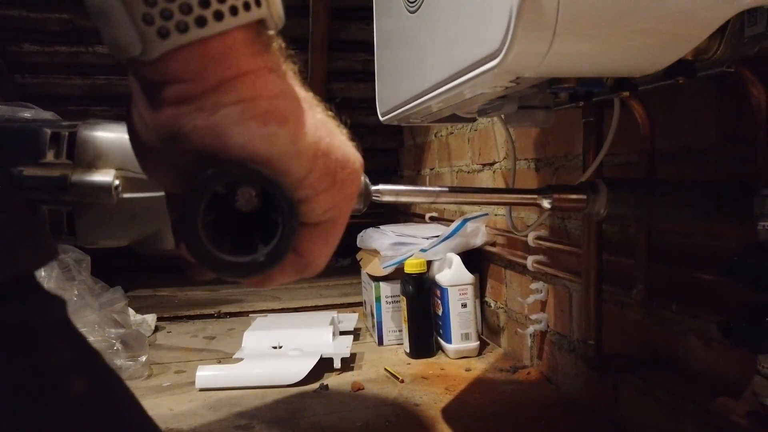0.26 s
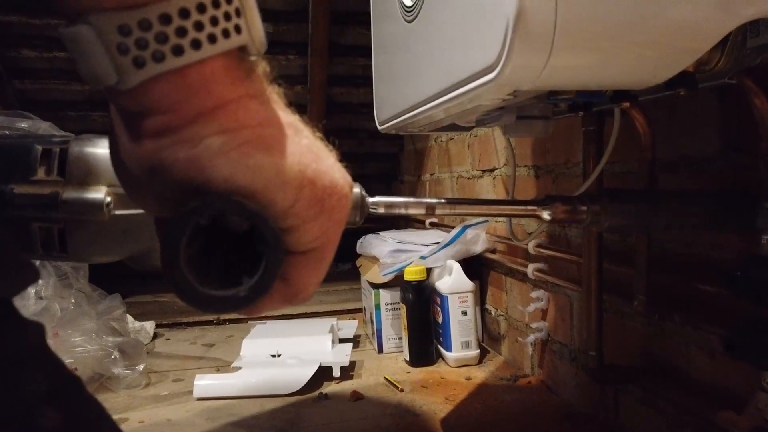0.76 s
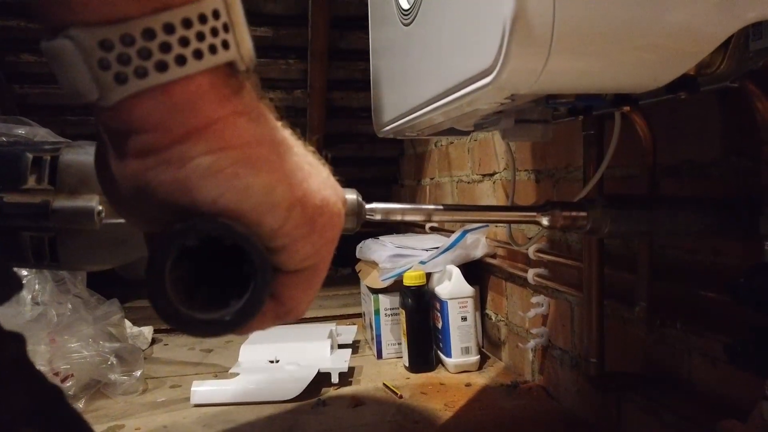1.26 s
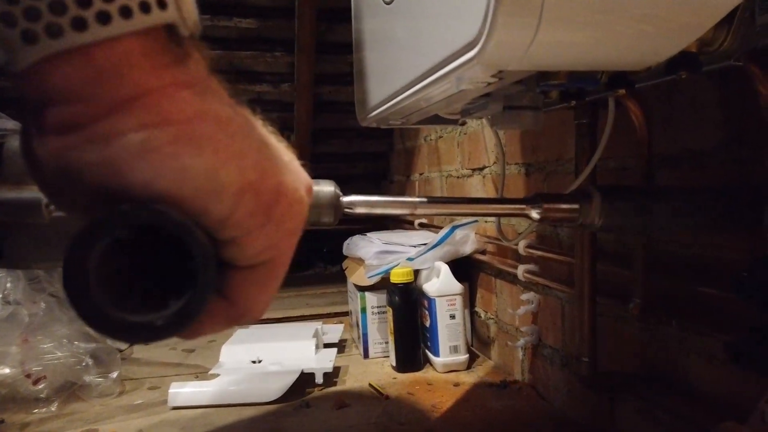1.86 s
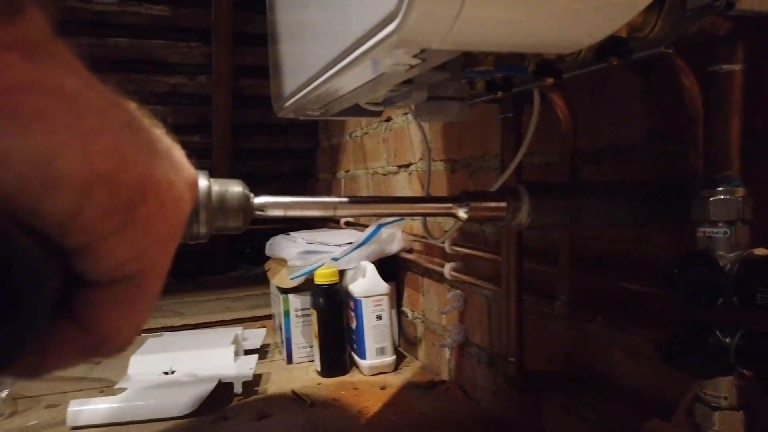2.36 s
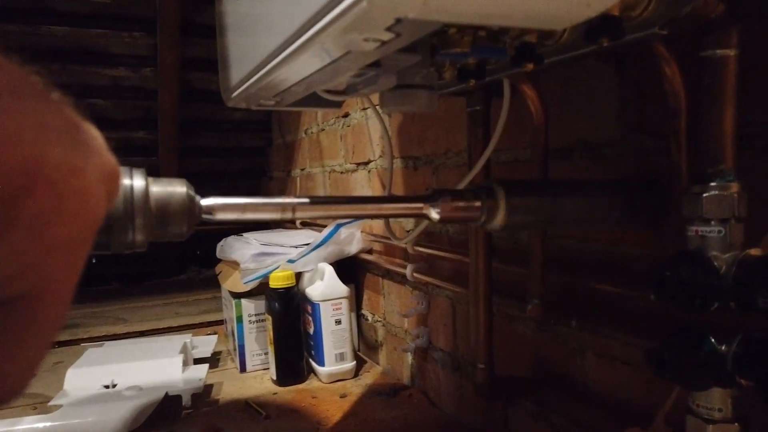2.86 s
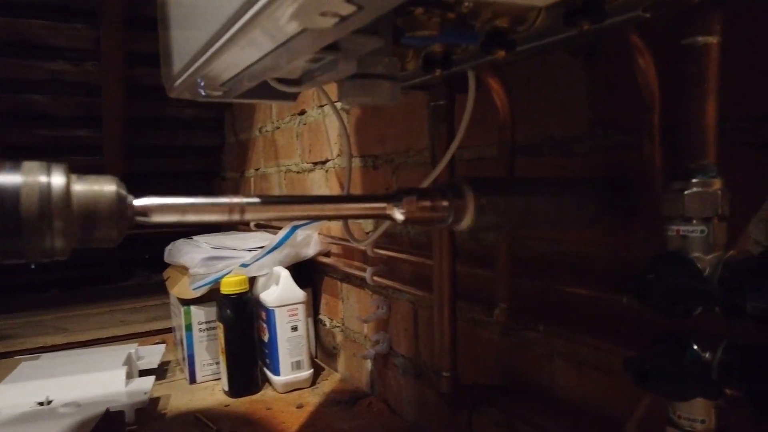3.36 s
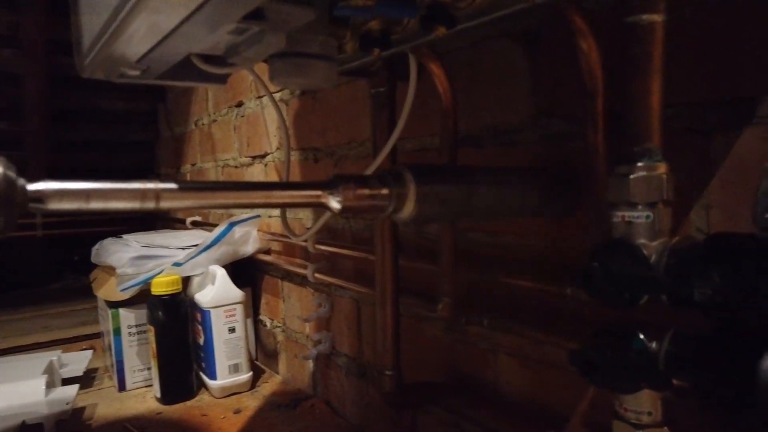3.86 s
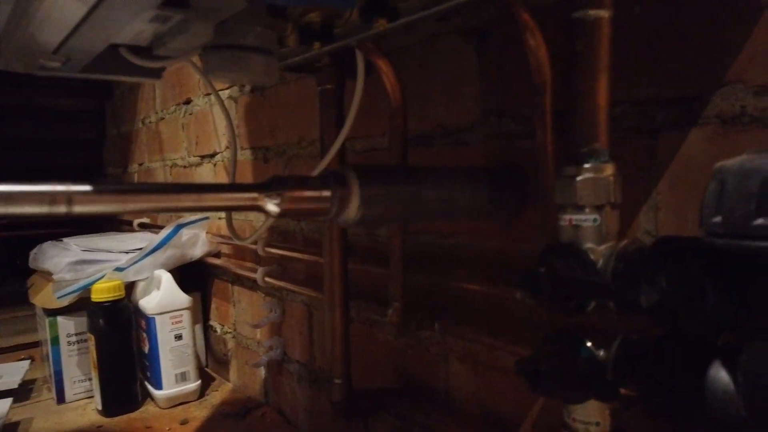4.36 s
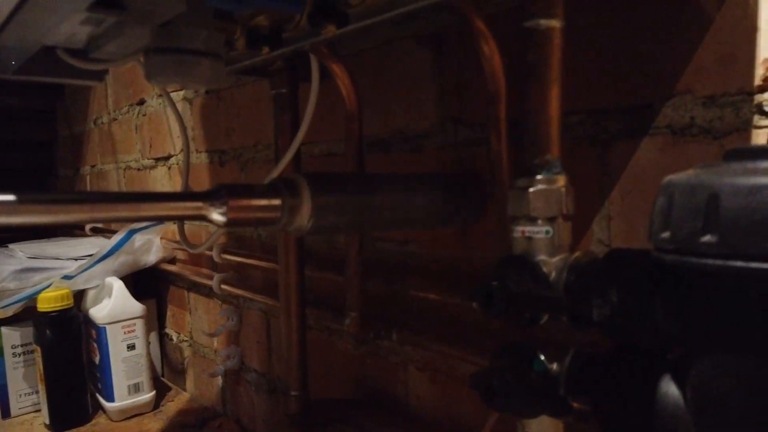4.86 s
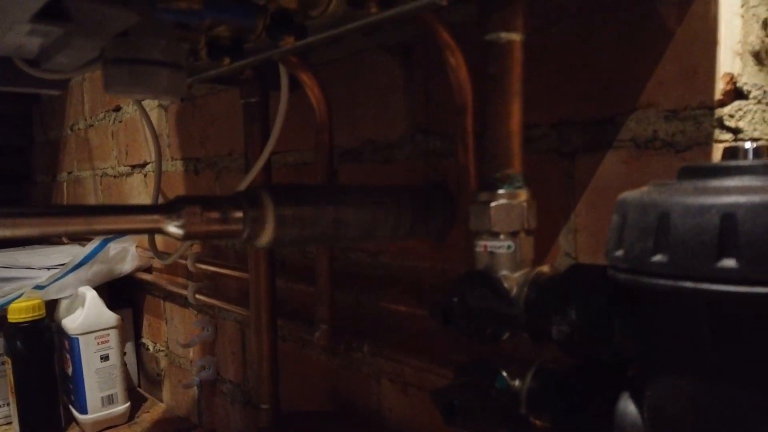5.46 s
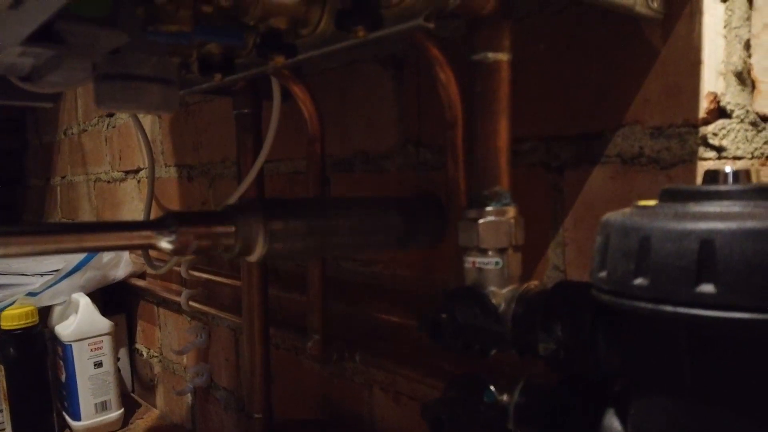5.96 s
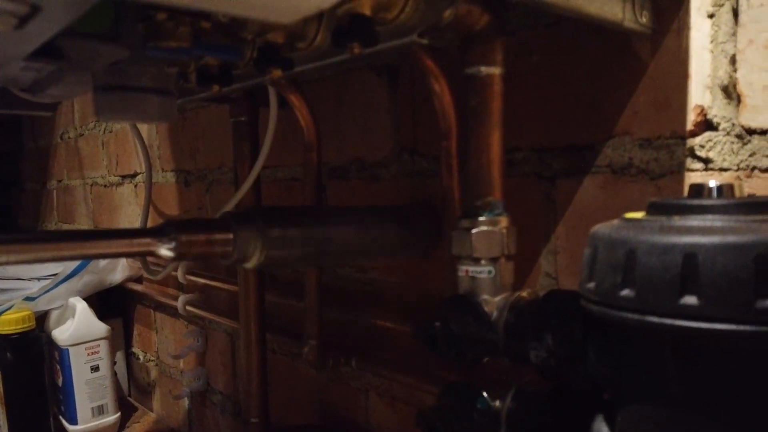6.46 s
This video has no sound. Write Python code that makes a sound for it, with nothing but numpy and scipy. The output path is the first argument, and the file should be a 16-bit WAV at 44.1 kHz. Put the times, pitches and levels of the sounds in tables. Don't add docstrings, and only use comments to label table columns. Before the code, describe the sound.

Close by in a small brick utility room, an electric core drill spins up within a second to a steady high whine. Gritty grinding and bright hiss run throughout, with soft wall thumps about ten times a second. Around halfway, the steel barrel begins to squeal, a piercing pulsing tone that dominates, eases briefly near the end, then returns. The drill is still running when it stops.

```python
import sys
import numpy as np
from scipy import signal
from scipy.io import wavfile
from scipy.ndimage import uniform_filter1d

SR = 44100
rng = np.random.default_rng(int(sys.argv[2]) if len(sys.argv) > 2 else 0)


def transcribe(u):
    v = np.clip(np.atleast_2d(u).T, -1, 1)
    q = np.round(v * 32767).astype(np.int16)
    wavfile.write(sys.argv[1], SR, q)


def ratio_of_db(decibels):
    return 10 ** (np.asarray(decibels, float) / 20)


N = 295911
CONTROL_STEP = 40


def rms_one(x):
    return x / np.sqrt(np.mean(x ** 2) + 1e-20)


def in_time(rows):
    time_s, *columns = np.transpose(rows)
    t = np.arange(N) / SR
    return [np.interp(t, time_s, column) for column in columns]


def at_hz(points, hz):
    points = np.array(points)
    return np.interp(np.log(hz), np.log(points[:, 0]), points[:, 1])


def coarse(rate_hz):
    r = np.exp(-2 * np.pi * CONTROL_STEP * rate_hz / SR)
    white = rng.standard_normal(N // CONTROL_STEP + 2001)
    settled = signal.lfilter([1], [1, -2 * r, r * r], white)[2000:]
    return rms_one(settled)


def stretch(control):
    return np.interp(np.arange(N) / CONTROL_STEP, np.arange(len(control)), control)


def drift(rate_hz):
    return stretch(coarse(rate_hz))


def phase_of(hz):
    return 2 * np.pi * np.cumsum(hz) / SR


def tone(phase, lead_rad):
    return np.sqrt(2) * np.sin([phase + lead_rad / 2, phase - lead_rad / 2])


def pair(alike):
    mid, side = rng.standard_normal((2, N))
    return np.sqrt((1 + alike) / 2) * mid + np.sqrt((1 - alike) / 2) * side * [[1], [-1]]


def lowpass(x, hz):
    return signal.sosfilt(signal.butter(2, hz, fs=SR, output="sos"), x)


def bandpass(x, low_hz, high_hz):
    return signal.sosfilt(signal.butter(2, [low_hz, high_hz], "band", fs=SR, output="sos"), x)


def resonate(x, hz, width_hz):
    r = np.exp(-np.pi * width_hz / SR)
    return signal.lfilter([1, 0, -1], [1, -2 * r * np.cos(2 * np.pi * hz / SR), r * r], x)


def clicks(rows, column):
    rows = np.array(rows)
    out = np.full(N, 1e-18)
    out[(rows[:, 0] * SR).astype(int)] = ratio_of_db(rows[:, column])
    return out


def swell(x, rise_s, fall_s):
    t = np.arange(int(.2 * SR)) / SR
    bump = (1 - np.exp(-t / rise_s)) * np.exp(-t / fall_s)
    return signal.fftconvolve(x, bump / bump.max())[:N]


def each_turn(turns, levels_db, scatter_db):
    at = np.flatnonzero(np.diff(np.floor(turns)) > 0)
    chance = np.random.default_rng(rng.integers(2 ** 31)).standard_normal((len(at), len(levels_db)))
    return np.c_[at / SR, np.transpose(levels_db)[at] + scatter_db * chance]


# [t/s, speed/(turns/s)]
ARMATURE_SPEED = [(0, 212), (.1, 250), (.2, 292), (.3, 318), (.43, 346), (.55, 366), (.75, 396), (1, 411),
                  (1.3, 414.5), (2, 410.5), (2.7, 411), (3.3, 402), (4.3, 399), (4.7, 398), (5.3, 412),
                  (5.7, 416.5), (6.2, 411), (6.71, 402)]


def barrel_turns():
    return np.cumsum(in_time(ARMATURE_SPEED)[0]) / SR / 40.3


# [t/s, hum/dB, mesh/dB, fan/dB]
MOTOR_LEVELS = [(0, -44, -42.5, -60), (.1, -54, -34.5, -49), (.2, -60, -40, -47.5), (.28, -52, -50, -47.5),
                (.45, -54, -39, -47.5), (.6, -43, -47, -50), (.9, -39.5, -50, -54),
                (1.15, -40.5, -45, -48.5), (2.8, -38.5, -42.5, -51), (3.1, -40, -43, -62),
                (3.85, -42, -44, -60), (4, -42, -44, -50), (4.6, -43, -45.5, -51), (5.1, -42.5, -45, -58),
                (5.4, -43.5, -45, -49), (6.0, -42.5, -45, -51), (6.71, -43.5, -47, -55)]
MESH_ORDERS = [5.84, 6.14]
WHINE_ORDERS = [1.31, 2, 19.5]
# [level/dB, flicker/dB, growth exponent with speed]
WHINE_LEVELS = [(-56, 1.5, 5.0), (-55, 1.5, 5.0), (-47.5, 3.0, 5.0)]


def motor():
    speed = in_time(ARMATURE_SPEED)[0]
    turn = phase_of(speed)
    hum_db, mesh_db, fan_db = in_time(MOTOR_LEVELS)
    out = ratio_of_db(hum_db + 1.9 * drift(18)) * tone(turn, 0.25)
    fan_phase = 34.97 * turn + .8 * drift(15)
    out += ratio_of_db(fan_db + 2.2 + 3.5 * drift(9)) * tone(fan_phase, .7)
    mesh_lead_rad = np.interp(speed, [300, 390], [.4, 1.9])
    for order in MESH_ORDERS:
        mesh_phase = order * turn + .25 * drift(12) + .4 * drift(70)
        out += ratio_of_db(mesh_db + 1.5 + 1.5 * drift(14)) * tone(mesh_phase, mesh_lead_rad)
    for order, (level_db, flicker_db, growth) in zip(WHINE_ORDERS, WHINE_LEVELS):
        ripple = .03 * order * drift(9.9)
        level = (speed / 412) ** growth * ratio_of_db(level_db + flicker_db * drift(13.0))
        out += level * tone(order * turn + ripple, 0.24 * order)
    return out


# [f/Hz, level/dB]
GRIND_COLOUR = [(25, 1.5), (60, -5), (120, -4.5), (200, -7), (320, -9), (500, -3.5), (800, -4), (1400, 1.5),
                (2500, -1.5), (4000, -3.5), (6300, -6), (10000, -2), (13000, -2.5), (15800, -8)]
# [f/Hz, correlation]
EAR_LIKENESS = [(30, .3), (70, 0.73), (130, 0.79), (900, 0.94), (1700, 0.85), (2200, 0.038), (3200, 0.58),
                (4500, 0.16), (8000, 0.43), (15000, 0.26)]
# [t/s, pressure/dB, distance loss/dB]
CUT_LOAD = [(0, 3, 10), (.09, 2, -1), (.32, -2, 1.5), (1.2, 0, 1.5), (3, 2.5, -0.5), (4.2, 1.5, 3),
            (4.8, 3.5, 0), (5.6, 0.9, 6.5), (6.28, 2.5, 6), (6.71, 2.3, 4.5)]
# [f/Hz, share of pressure, share of distance loss]
LOAD_SHARES = [(149, 0.51, 1.2), (780, 1, -0.15), (4500, 1, -0.28), (10000, 0.35, 0.17)]
# [f/Hz, width/Hz, level/dB, extra in spin-up/dB]
BODY_MODES = [
    (180, 28, -54.5, 17),
    (239, 33, -64, -21),
    (1237, 390, -52, 2),
    (1698, 67, -48, 11),
    (2125, 25, -39, 4),
    (3144, 55, -39.5, 6),
    (4800, 500, -45.5, -2),
    (7560, 130, -51, 9),
]


def grinding(blows, patchy_db=1.11, throb_db=1.4):
    pressure_db, far_db = [column[::CONTROL_STEP] for column in in_time(CUT_LOAD)]
    far_db = far_db - far_db.mean()
    grip_db = in_time(GRIP_CURVE)[0][::CONTROL_STEP]
    spread = 0.39 * np.clip((grip_db + 22) / 11, 0, 1)
    shares = np.array(LOAD_SHARES)
    push = swell(clicks(blows, column=2) > 1e-9, 0.0036, 0.0043)[::CONTROL_STEP]
    spin_up = np.exp(-np.arange(len(push)) * CONTROL_STEP / SR / .5)
    out = np.zeros((2, N))
    edges_hz = 24 * 2 ** np.arange(0, 9.7, .4)
    white = rng.standard_normal((2, 2, N))
    together = coarse(7.8)
    for k, (low_hz, high_hz) in enumerate(zip(edges_hz, edges_hz[1:])):
        mid, side = bandpass(white[k % 2], low_hz, high_hz)
        hz = np.sqrt(low_hz * high_hz)
        load_db = at_hz(shares, hz) * pressure_db - at_hz(shares[:, ::2], hz) * far_db
        load_db -= 5.0 * spin_up * (hz > 11000)
        alike = np.clip(at_hz(EAR_LIKENESS, hz) - spread * (hz < 2000), -.9, .99)
        flicker_db = patchy_db * (together / 3 + coarse(12))
        gain = ratio_of_db(at_hz(GRIND_COLOUR, hz) + load_db + throb_db * push + flicker_db)
        mid = mid * stretch(gain * np.sqrt(1 + alike))
        side = side * stretch(gain * np.sqrt(1 - alike))
        out += [mid + side, mid - side]
    out = ratio_of_db(-29.5) * rms_one(out)
    near, wide = pair(1.0), pair(0.19)
    for hz, width_hz, level_db, start_db in BODY_MODES:
        load_db = start_db * spin_up + 0.81 * coarse(17.0)
        feed = near if hz < 1900 else wide
        out += stretch(ratio_of_db(level_db + load_db)) * rms_one(resonate(feed, hz, width_hz))
    return out


# [t/s, centre f/Hz, glaze/dB (narrow hump to broad)]
RIM_WEAR = [(0, 10660, -5), (.5, 10670, -5.5), (1.7, 10650, -5), (2.4, 10660, -9.5), (3, 10950, -11),
            (3.6, 10800, -9), (4.4, 10770, -7.5), (5.1, 11000, 4), (5.8, 10360, 5), (6.1, 10620, 1),
            (6.71, 10710, 1)]


def rim_hiss():
    hz, glaze_db = in_time(RIM_WEAR)
    carrier = np.exp(1j * phase_of(hz))
    feed = pair(0.13) + 1j * pair(0.42)
    humps = [(-44 - glaze_db, 300), (-39.5 + 1.37 * glaze_db, 1300)]   # level/dB, half width/Hz
    out = 0
    for level_db, width_hz in humps:
        hump = rms_one(np.real(lowpass(feed, width_hz) * carrier))
        turn_db = 0.25 * np.sin(2 * np.pi * barrel_turns() + 1.3)
        out = out + ratio_of_db(level_db + 1.4 * drift(6.5) + turn_db) * hump
    return out


# [t/s, thump peak/dB, clack/dB, knock angle/turns]
BARREL_PLAY = [(.05, -22, -32, 0.33), (.2, -30, -37, 0.31), (.7, -29, -34, 0.39), (1.05, -21.5, -32, 0.34),
               (1.3, -23.5, -41, 0.26), (1.45, -26, -32, 0.39), (1.95, -18.5, -29.5, 0.36),
               (2.07, -22.5, -34, 0.36), (2.46, -27, -28, 0.39), (2.64, -22, -30, 0.39),
               (2.95, -28.5, -38, .43), (3.1, -35, -26, 0.49), (3.4, -48, -26, 0.53), (3.7, -37, -26, .5),
               (4.3, -71, -42, 0.35), (5.1, -37, -34, .42), (5.7, -35, -38, .42), (6.0, -67, -45, .4)]


def knock_rows():
    thump_db, clack_db, angle = in_time(BARREL_PLAY)
    return each_turn(barrel_turns() - angle, [thump_db, clack_db], scatter_db=1.5)


# [f/Hz, level/dB, time to top/s]
THUMP_MODES = [
    (170, 1, 0.007),
    (114, -14, 0.0094),
    (232, -15.5, 0.023),
]
# [t/s, peak/dB]
BARREL_RINGS = [(0.0967, -25.5), (0.2478, -28), (0.358, -34), (0.826, -30), (1.8701, -34), (2.1615, -28.5),
                (2.2498, -30), (2.4588, -33), (2.558, -27), (3.055, -28.5), (3.1577, -31), (3.3922, -39),
                (3.5583, -32), (3.6596, -30), (4.1999, -29), (4.582, -30.5), (4.7197, -25), (4.8229, -25.5),
                (4.9272, -20.5), (5.0085, -24.5), (5.1208, -23), (5.2205, -22), (6.1774, -30),
                (6.2672, -35)]


def knocks(blows):
    t = np.arange(int(.15 * SR)) / SR
    shape = 0
    for hz, level_db, top_s in THUMP_MODES:
        bump = (t / top_s * np.exp(1 - t / top_s)) ** 3
        shape = shape + ratio_of_db(level_db) * bump * np.sin(2 * np.pi * hz * t)
    thump = ratio_of_db(-2.5) * signal.fftconvolve(clicks(blows, column=1), shape)[:N]
    grit = pair(0.96)
    blow = swell(clicks(blows, column=2), 0.0033, 0.017) ** 1.378 / ratio_of_db(-9.0)
    clack = ratio_of_db(-3.5) * blow * rms_one(bandpass(grit, 230, 3400))
    clack = clack + ratio_of_db(-2.5) * blow * rms_one(resonate(grit, 2010, 50))
    ring_phase = phase_of(3155 + 25 * drift(12.43))
    ring = ratio_of_db(-2.5) * swell(clicks(BARREL_RINGS, column=1), 0.0081, 0.012) * tone(ring_phase, 1.0)
    return thump + clack + ring


# [t/s, top of a rub/dB, sag between rubs/dB, lateness of top/turns]
GRIP_CURVE = [(0, -46, -1, 0.061), (2.1, -40, -9, .1), (2.3, -32.5, 1, 0.59), (2.52, -24.5, 9.5, 0.078),
              (2.75, -27.5, 7, 0.11), (3.0, -24.5, 10, 0.13), (3.12, -16.5, 5, 0.046),
              (3.3, -17.5, 11, 0.043), (3.5, -8.5, 13, 0.018), (3.8, -12, 9, .02), (4.1, -9.5, 9, 0.022),
              (4.5, -10, 12.5, 0.033), (4.7, -13.5, 0, 0.22), (5.1, -7, 15.5, .07), (5.4, -26, 1.5, .1),
              (5.75, -27, 8, .1), (6, -10, 8, .1), (6.62, -10, 5, 0.27)]
RUB_SHAPE = [
    (0, 0.078),
    (.25, 0.39),
    (.55, 0.94),
    (.75, .8),
    (.9, 0.028),
]
# [t/s, top/dB, length/s]
HARD_SPOTS = [(0.035, -24.5, 0.031), (0.528, -28.5, 0.019), (.973, -29, 0.028), (2.49, -29.5, 0.027),
              (2.68, -27.5, 0.028), (2.918, -19, 0.042), (3.217, -18, 0.034), (3.313, -47, 0.013),
              (3.898, -20, .012), (4.637, -18, 0.054), (4.707, -16, .012), (4.746, -18, .015),
              (4.864, -35, 0.0049), (4.907, -0.5, 0.0096), (5.317, -30, 0.017), (5.825, -44, 0.014),
              (5.896, -50, 0.01), (6.176, -18, .012), (6.273, -15.5, 0.014), (6.373, -15.5, 0.0061),
              (6.412, -20, 0.0099), (6.473, -23, 0.0092)]
# [t/s, length/s]
GRIP_SLIPS = [
    (2.775, 0.021),
    (3.917, 0.012),
    (4.217, 0.0086),
    (4.728, 0.015),
    (4.915, 0.024),
    (6.392, 0.015),
    (6.562, .016),
    (6.73, 0.068),
]


def rub_height():
    top_db, sag_db, late = in_time(GRIP_CURVE)
    angle, share = np.transpose(RUB_SHAPE)
    sag = np.interp(barrel_turns() - late, angle, share, period=1)
    height = ratio_of_db(top_db - sag_db * sag)
    t = np.arange(N) / SR
    for time_s, level_db, length_s in HARD_SPOTS:
        height = height + ratio_of_db(level_db) * np.exp(-((t - time_s) / length_s) ** 2)
    for time_s, length_s in GRIP_SLIPS:
        u = (t - time_s) / length_s
        height = height * np.tanh(u * np.abs(u))
    return uniform_filter1d(height, size=200)


# [t/s, f/Hz, left-ear lead/rad]
SQUEAL_PITCH = [(0, 2147, -1.06), (2, 2144, -1.75), (2.6, 2146, -0.54), (3.1, 2139, -0.5),
                (3.65, 2145, 0.45), (4.3, 2141, 0.49), (4.8, 2140, 0.44), (5.1, 2142, 0.42),
                (5.7, 2138, 0.84), (6.3, 2143.8, 0.55), (6.71, 2138, 0.9)]
# [t/s, second overtone/dB, third overtone/dB]
BITE_OVERTONES = [(3.05, -50, -55), (3.4, -31, -37), (3.7, -31, -40), (4.1, -28.5, -36), (4.45, -38, -42),
                  (4.6, -37, -32), (5, -41, -33), (5.25, -40, -45), (5.85, -48, -45), (6, -31.5, -37),
                  (6.2, -35, -30.5), (6.55, -32, -36), (6.71, -36, -48)]
UPPER_OVERTONES_DB = [-5, -1]


def squeal():
    height = rub_height() * ratio_of_db(-0.1 + 0.13 * drift(40))
    second_db, third_db = in_time([(0, -70, -70)] + BITE_OVERTONES)
    upper_db = [third_db] + [third_db + db for db in UPPER_OVERTONES_DB]
    bites = each_turn(barrel_turns() + 0.19, [second_db], scatter_db=1.5)
    snarls = each_turn(barrel_turns() + 0.13, upper_db, scatter_db=1.5)
    hz, lead_rad = in_time(SQUEAL_PITCH)
    phase = phase_of(hz) + 0.32 * drift(8.4)
    out = height * tone(phase, lead_rad + 0.12 * drift(21.0))
    out += ratio_of_db(-23) * height * rms_one(resonate(pair(0.18), 2170, 310))
    bite = swell(clicks(bites, column=1), 0.005, 0.031)
    out += ratio_of_db(-3) * bite * tone(2 * phase + 0.39 * drift(30), -1.1)
    for k, trim_db in enumerate([-4, -2, -2]):
        snarl = swell(clicks(snarls, column=k + 1), 0.0042, 0.018)
        out += ratio_of_db(trim_db) * snarl * tone((k + 3) * phase, -0.6)
    return out


def scene():
    blows = knock_rows()
    ease = ratio_of_db(-4 * np.abs(rub_height()) / ratio_of_db(-7))
    return ease * motor() + ease ** 0.29 * grinding(blows) + rim_hiss() + knocks(blows) + squeal()


def low_pass(x):
    return signal.sosfilt(signal.butter(12, 15990, fs=SR, output="sos"), x)


def record(dry):
    top_cut = signal.ellip(10, .5, 60, 15830, fs=SR, output="sos")
    mix = signal.sosfilt(top_cut, dry)
    return low_pass(mix)


dry = scene()
out = record(dry)
transcribe(out)
```